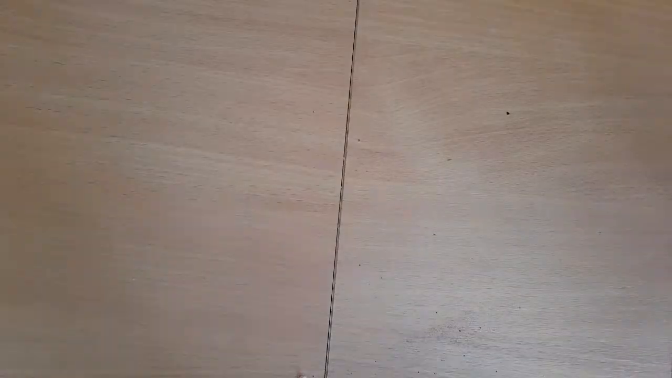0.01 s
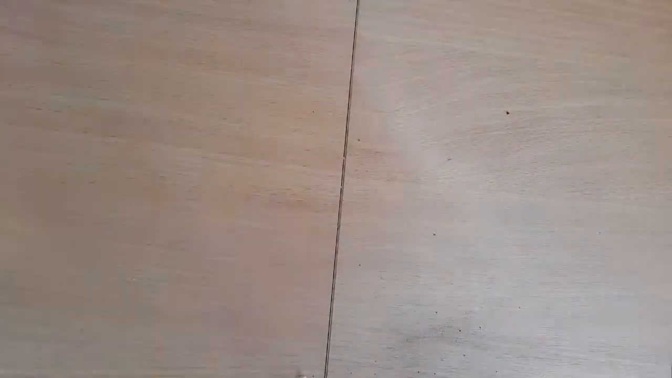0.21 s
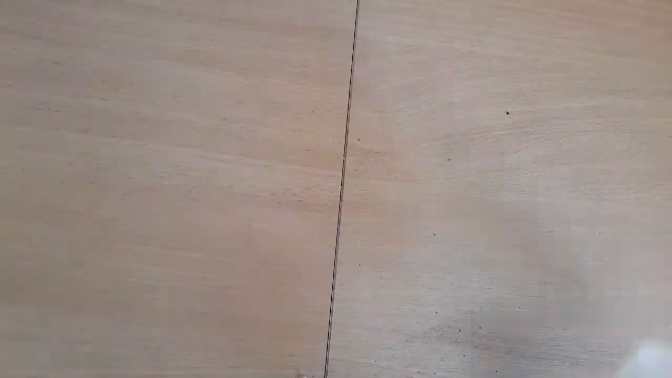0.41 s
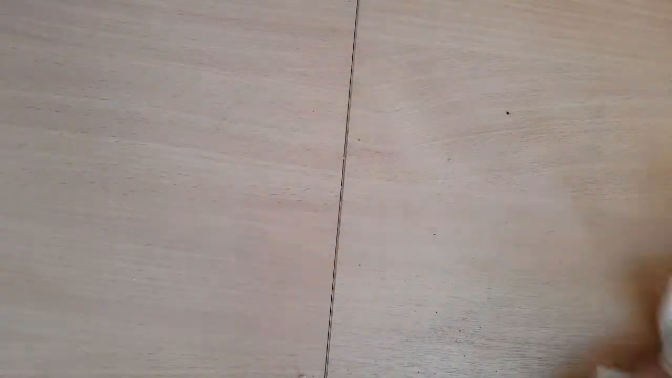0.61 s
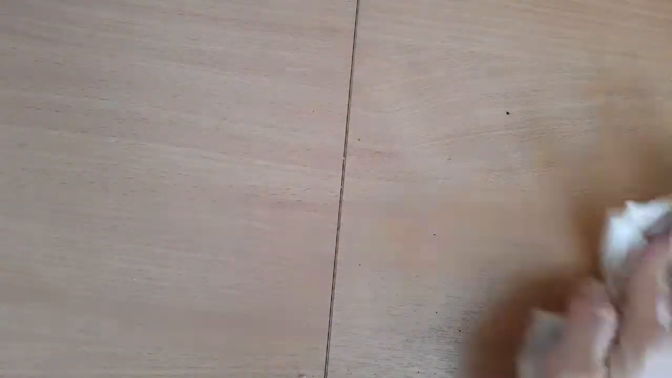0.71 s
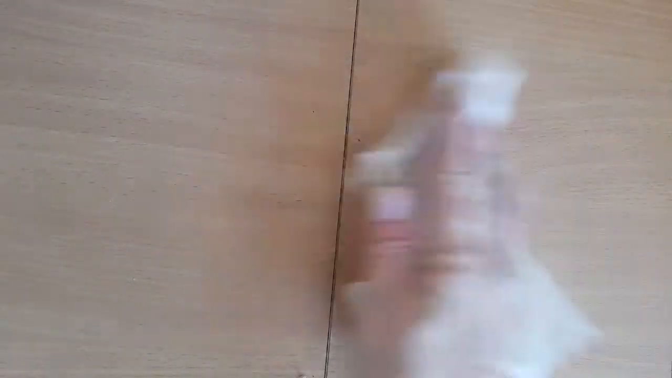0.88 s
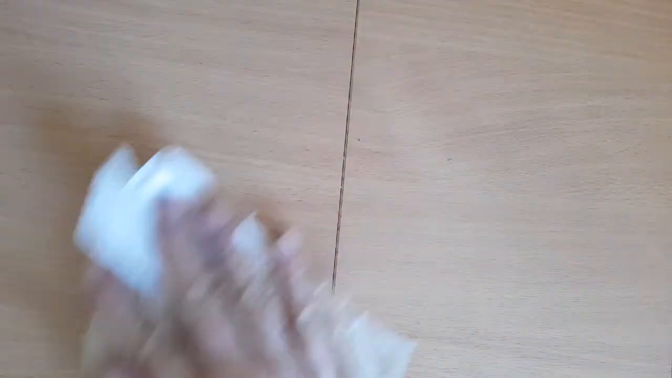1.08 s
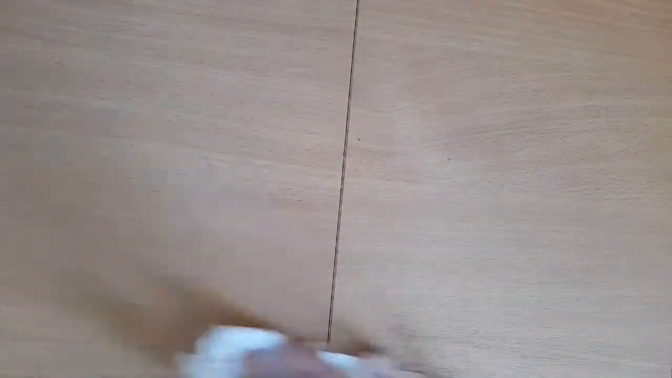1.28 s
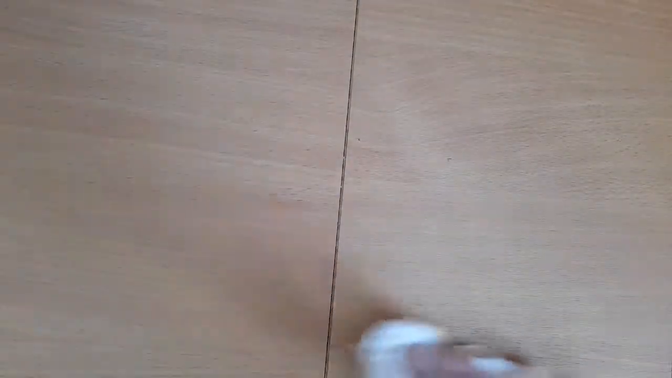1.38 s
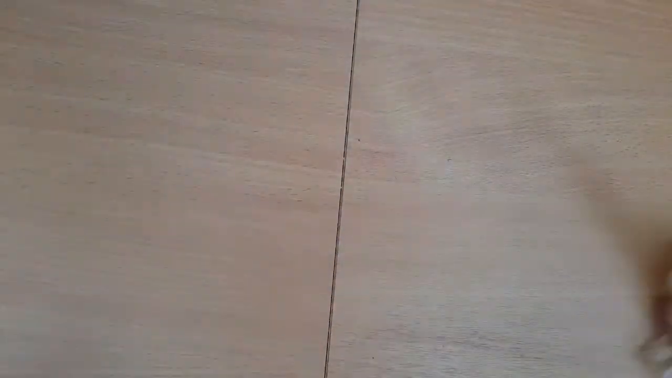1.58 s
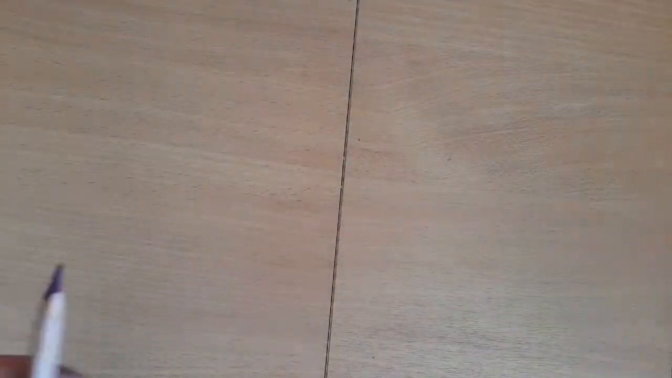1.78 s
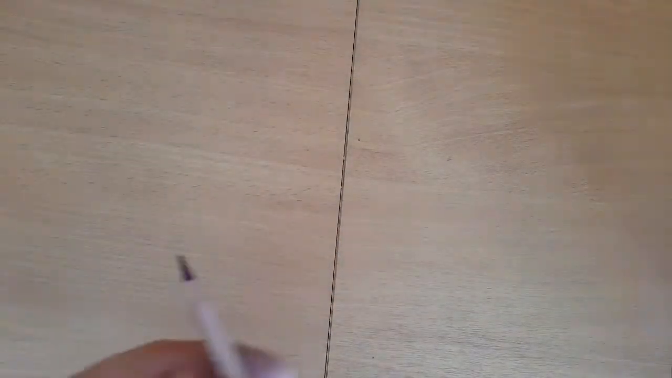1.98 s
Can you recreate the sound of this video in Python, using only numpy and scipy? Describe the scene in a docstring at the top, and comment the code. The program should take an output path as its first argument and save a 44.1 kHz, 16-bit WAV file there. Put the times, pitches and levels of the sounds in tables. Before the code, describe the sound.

Close stereo sound of a hand wiping a wooden desktop with tissue; hollow scrubbing and small thumps build to a crisp snap, followed by airy swishing, a few faint crackles and low room hum.

```python
"""Paper tissue wiping a wooden desk

A hand wipes a desk with a crumpled tissue, close to the microphone in a quiet, faintly humming room.
Friction is random slips with a juddering force; the board rumbles and rings through its resonances.
Catches, thumps and brief chattering tones punctuate the rub; the paper crackles and snaps once.
It sweeps with a bright hiss of shaped slip noise and lifts away."""
import sys
import numpy as np
from scipy import signal
from scipy.fft import rfft, irfft
from scipy.io import wavfile

SR = 44100
rng = np.random.default_rng(int(sys.argv[2]) if len(sys.argv) > 2 else 0)


def transcribe(u):
    """Save the signal u as a 16-bit wav file named by the first command-line argument.

    u: samples, shape (n,) or (channels, n), limited to [-1, 1]; the rate is SR.
    q: integer samples, one column per channel.
    """
    v = np.clip(np.atleast_2d(u).T, -1, 1)
    q = np.round(v * 32767).astype(np.int16)
    wavfile.write(sys.argv[1], SR, q)


N = 90405
T = np.arange(N) / SR  # time of every sample [s]

# path of the hand: (time [s], left ear lag [ms], left-right balance [dB])
HAND_PATH = [(0, -0.086, 3), (.26, 0.079, -0.5), (.4, 0.091, 0), (.62, 0.2, -0.4), (.76, 0.15, 1),
             (.92, 0.046, -0.3), (1.05, -0.14, 0.5), (1.22, -0.15, 2.7), (1.4, -0.026, 1.2),
             (1.62, 0.23, -1), (1.85, 0.27, -1.5)]
# spectrum of crackling creases: (frequency [Hz], relative density [dB per Hz])
CREASE_SPECTRUM = [(1500, -5), (3000, -7), (5500, 7), (8000, 6.5), (15000, -17)]


def from_db(db):
    """Logarithmic level: decibels to amplitude gain."""
    return 10 ** (np.asarray(db) / 20)


def rms_one(x):
    """Normalisation: scale to unit mean power."""
    return x / np.sqrt(np.mean(x ** 2) + 1e-20)


def in_time(rows):
    """Linear interpolation: each column of a curve at every sample."""
    times, *columns = np.transpose(rows)
    return [np.interp(T, times, column) for column in columns]


def low_noise(cutoff_hz):
    """Low-pass filtering of white noise leaves a slow random swing; rms 1."""
    sos = signal.butter(2, cutoff_hz, fs=SR, output="sos")
    return rms_one(signal.sosfilt(sos, rng.standard_normal(N)))


def colour(x, spectrum):
    """Linear filtering: give a signal a smooth spectrum; rms 1."""
    hz, db = np.transpose(spectrum)
    f = np.maximum(np.fft.rfftfreq(2 * N, 1 / SR), 1)
    # amplitude falls as the frequency squared outside the listed range
    skirt = np.minimum(f / hz[0], 1) ** 2 * np.minimum(hz[-1] / f, 1) ** 2
    gain = skirt * from_db(np.interp(np.log(f), np.log(hz), db))
    return rms_one(irfft(rfft(x, 2 * N) * gain)[..., :N])


def resonate(x, hz, width_hz):
    """Damped oscillator: a two-pole resonance with gain 1 on top."""
    r = np.exp(-np.pi * width_hz / SR)
    zeros = np.array([1, 0, -1]) * (1 - r * r) / 2
    poles = [1, -2 * r * np.cos(2 * np.pi * hz / SR), r * r]
    return signal.lfilter(zeros, poles, x + 1e-18)


def friction(per_s, spread_db, smooth_db):
    """Dry friction: uneven tiny slips at random moments, over smooth sliding noise."""
    sizes = from_db(spread_db * np.minimum(rng.exponential(1, N), 4)) * rng.choice([-1, 1], N)
    slips = rms_one(sizes * (rng.random(N) < per_s / SR))
    return rms_one(slips + from_db(smooth_db) * rng.standard_normal(N))


def judder(rate_hz, depth_db):
    """Amplitude modulation: random swings of contact force, their peaks limited by the soft hand."""
    limit = 1.5  # in standard deviations of the swing
    return rms_one(from_db(depth_db * np.minimum(low_noise(rate_hz), limit)))


def desk(x):
    """Modal resonance: the board adds its modes to whatever rubs on it."""
    # modes of the desk: (frequency [Hz], width [Hz], relative gain [dB])
    desk_modes = [(200, 100, -4), (360, 23, -12), (657, 8.9, 4.5), (715, 14, -3), (840, 23, -6.5),
                  (977, 15, -12), (1209, 22, 1), (1299, 11, 2.5), (1444, 15, -3), (1540, 14, -4.5),
                  (1860, 65, 1), (2710, 13, 5.5)]
    ring_db = -2.5  # added to every mode
    return x + sum(from_db(ring_db + db) * resonate(x, hz, width) for hz, width, db in desk_modes)


def place(x, scatter_db, room_db, scatter_s=0.0046):
    """Binaural lag and balance: direct sound, shifting near reflections and a room tail."""
    room_t60_s, shift_s, echo_low_hz = 0.064, 0.1238, 149
    lag_ms, pan_db = in_time(HAND_PATH)
    age = T[:N // 6]
    highpass = signal.butter(1, echo_low_hz, "high", fs=SR, output="sos")
    ears = []
    for side in (1, -1):  # left, right
        direct = np.interp(T - side * lag_ms / 2000, T, x)  # half the lag for each ear
        tail = rng.standard_normal(len(age)) * from_db(-60 * age / room_t60_s) * (age > .006)
        echo = from_db(room_db) * signal.fftconvolve(x, tail / np.linalg.norm(tail))[:N]
        # two reflection patterns trade places in quadrature
        for phase in (0, np.pi / 2):
            near = rng.standard_normal(len(age)) * np.exp(-age / scatter_s)
            share = np.cos(T / shift_s + phase)
            echo += from_db(scatter_db) * signal.fftconvolve(x * share, near / np.linalg.norm(near))[:N]
        echo = signal.sosfilt(highpass, echo)
        ears.append((direct + echo) * from_db(side * pan_db / 2))
    return rms_one(np.array(ears)) * x.std()


def stereo_balance():
    """Level difference between the ears: gains that follow the hand, left above right."""
    _, pan_db = in_time(HAND_PATH)
    return from_db(np.outer([1, -1], pan_db) / 2)


def room_tone(side_db=-10):
    """Stationary noise: a low rumble of the room with a sinusoidal mains hum."""
    # rumble spectrum: (frequency [Hz], relative density [dB per Hz])
    rumble_spectrum = [(20, -20), (45, -2), (75, -7), (100, 7), (135, -6), (200, -6.5), (330, -23.5),
                       (600, -23.5), (2000, -40), (15000, -42)]
    rumble_db, hum_db, hum_hz = -62.5, -68.5, 100
    mid, side = colour(rng.standard_normal((2, N)), rumble_spectrum)
    hum = from_db(hum_db) * np.sqrt(2) * np.sin(2 * np.pi * hum_hz * T)
    return from_db(rumble_db) * (mid + from_db(side_db) * side * [[1], [-1]]) + hum


def hollow(x):
    """Cavity resonance: the hollow between wad and desk glides as the hand presses."""
    # resonance: (time [s], centre frequency [Hz], height [dB])
    cavity_glide = [(.1, 1250, 0), (.24, 815, -5), (0.33, 1050, -3), (0.42, 1060, 7), (0.57, 900, 4),
                    (0.67, 1210, 7), (.755, 1500, 3), (0.85, 1370, 5.5), (0.94, 1450, 3.5), (.995, 980, 5),
                    (1.05, 1450, 10), (1.15, 1600, 9), (1.4, 1340, 11.5), (1.62, 1160, 8.5), (1.9, 980, -3)]
    width_octaves = 0.16  # standard deviation of the Gaussian peak
    hz, height_db = in_time(cavity_glide)
    f = np.log2(np.maximum(np.fft.rfftfreq(N, 1 / SR), 1))
    spectrum, out = rfft(x), 0
    # overlapping bands, each raised while the resonance passes over it
    centres = np.log2(np.geomspace(400, 4000, 12))
    for centre, weights in zip(centres, np.eye(len(centres))):
        band = irfft(spectrum * np.interp(f, centres, weights), N)
        distance = (centre - np.log2(hz)) / width_octaves
        out = out + band * from_db(height_db * np.exp(-distance ** 2 / 2))
    return rms_one(out)


def dragging_hand():
    """Stick-slip excitation: coarse slips shake the board; the wad under the palm adds a hollow rub."""
    # hand pressure, heard as board rumble: (time [s], level before trim [dB])
    drag_curve = [(0.0, -81), (0.08, -71.5), (0.17, -73), (0.2, -53.5), (0.275, -46.5), (0.335, -50.5),
                  (0.38, -47), (0.42, -56.5), (0.6, -54.5), (0.655, -45), (0.7, -54.5), (0.73, -49),
                  (0.89, -71.5), (0.99, -68.5), (1.03, -65), (1.1, -69), (1.17, -65.5), (1.3, -72),
                  (1.6, -72.5), (1.645, -60.5), (1.7, -71.5), (2.05, -79.5)]
    # rubbing of the wad, heard as hollow midrange: (time [s], level before trim [dB])
    rub_curve = [(0.0, -64.5), (0.05, -62), (0.16, -66.5), (0.26, -49.5), (0.39, -48), (0.53, -51),
                 (0.6, -43.5), (0.665, -39.5), (0.685, -47), (0.755, -39), (0.82, -47.5), (0.96, -57.5),
                 (0.995, -49), (1.025, -51.5), (1.12, -51.5), (1.19, -49.5), (1.225, -60), (1.5, -61.5),
                 (1.63, -51.5), (1.69, -65), (1.84, -53.5), (1.93, -73), (2.05, -90)]
    # spectra of board and wad: (frequency [Hz], relative density [dB per Hz])
    board_spectrum = [(55, 2), (110, 4.5), (200, 1), (310, 0.5), (450, -4.5), (660, 3), (880, 2.5),
                      (1200, -12.5), (2200, -7.5), (5000, -35)]
    wad_spectrum = [(480, -17), (680, -8), (1000, -2), (1500, -1.5), (2100, -3), (3000, -7), (6000, -17)]
    drag_trim_db, rub_trim_db = 3.5, 0.5
    (drag_db,), (rub_db,) = in_time(drag_curve), in_time(rub_curve)

    drag = colour(desk(friction(2200, 2.9, -7.5) * judder(104, 1.8)), board_spectrum)
    drag = drag * from_db(drag_db + drag_trim_db)
    rub = hollow(colour(desk(friction(800, 2.7, -8.5) * judder(220, 1.55)), wad_spectrum))
    rub = rub * from_db(rub_db + rub_trim_db)
    return place(drag, scatter_db=-4, room_db=-11.5) + place(rub, scatter_db=-3.5, room_db=-5)


def sliding_paper(spot_db=-5, spread_db=-2):
    """Friction noise of fibres on grain: rasp at and around the pressed spot, hiss of the whole sheet."""
    # sliding: (time [s], coarse rasp level before trims [dB], fine hiss level before trim [dB])
    slide_curve = [(0.0, -61, -69), (0.05, -59, -62.5), (0.1, -66.5, -70.5), (0.18, -60, -68),
                   (0.19, -50, -55.5), (0.22, -61, -64), (0.26, -52.5, -59.5), (0.37, -45.5, -47),
                   (0.45, -48, -54.5), (0.59, -50.5, -51.5), (0.66, -42.5, -47), (0.755, -42.5, -41),
                   (0.79, -45.5, -43), (0.94, -57.5, -45), (1.0, -43.5, -41.5), (1.03, -50.5, -43),
                   (1.21, -45, -41), (1.3, -57.5, -39), (1.52, -53.5, -41.5), (1.63, -49, -39),
                   (1.74, -51.5, -42.5), (1.77, -53, -49.5), (1.85, -57, -57.5), (1.865, -67, -62),
                   (1.92, -60.5, -64), (1.97, -65.5, -71), (2.0, -75, -72.5), (2.05, -75.5, -76)]
    # spectra of rasp and hiss: (frequency [Hz], relative density [dB per Hz])
    rasp_spectrum = [(900, -9.5), (1700, -4), (2300, 0), (3100, 2.5), (4500, 1.5), (6000, -4.5),
                     (8000, -6.5), (15000, -47)]
    hiss_spectrum = [(2500, -7.5), (5000, -2), (7000, -2), (9000, -1), (10800, 1), (13000, -.5),
                     (15000, -4.5), (16000, -12.5)]
    rasp_trim_db, hiss_trim_db = 0.5, 0.6
    rasp_db, hiss_db = in_time(slide_curve)
    rasp_db = rasp_db + rasp_trim_db

    spot = colour(friction(2000, 4.7, -6) * judder(140, 1.4), rasp_spectrum)
    spot = spot * from_db(rasp_db + spot_db)
    # independent slips in each channel make a wide sound
    around = np.array([friction(4000, 3.1, 0.67) for _ in "LR"]) * judder(63, 1.7)
    around = colour(around, rasp_spectrum) * from_db(rasp_db + spread_db)
    sheet = np.array([friction(9000, 3.7, 0.61) for _ in "LR"]) * judder(72, 0.59)
    sheet = colour(sheet, hiss_spectrum) * from_db(hiss_db + hiss_trim_db)
    wide = np.sqrt(2) * (around + sheet) * stereo_balance()
    return place(spot, scatter_db=2, room_db=-25.0) + wide


def creases():
    """Impulsive release: small folds crackle crisply, each with an exponential decay."""
    # crackles: (time [s], level before reflections [dB])
    crackle_events = [(0.048, -46), (0.186, -45), (.192, -52), (.197, -51), (0.239, -35.5), (0.307, -37),
                      (.399, -47), (0.985, -31), (0.997, -35), (1.789, -37), (1.849, -46), (1.885, -41),
                      (1.911, -42.5), (1.974, -53)]
    decay_s = 0.0068  # time constant
    bursts = sum(from_db(db) * (T >= s) * np.exp(-np.abs(T - s) / decay_s) for s, db in crackle_events)
    grain = colour(friction(3000, 1, 0), CREASE_SPECTRUM)
    grain = grain / np.percentile(np.abs(grain), 99)
    return place(bursts * grain, scatter_db=12, room_db=3)


def catches():
    """Stick-slip release: each catch knocks on the board, then a run of smaller slips dies away."""
    # catches: (time [s], peak level before the desk [dB], band centre [Hz], decay constant [s])
    catch_events = [(0.193, -41.5, 750, 0.0067), (0.265, -32, 1400, 0.0013), (0.268, -38, 315, 0.0022),
                    (0.278, -44, 360, 0.0042), (0.288, -51, 804, .002), (0.306, -29.5, 1720, 0.0027),
                    (0.312, -44, 1310, 0.0022), (0.32, -40, 1200, .002), (0.343, -36.5, 980, 0.003),
                    (.372, -31.5, 760, 0.006), (0.377, -37, 1180, 0.0028), (0.396, -43, 1100, 0.0038),
                    (0.418, -31, 980, 0.0031), (0.444, -35, 810, 0.0033), (0.48, -40.5, 700, .002),
                    (0.61, -45, 860, .0015), (0.631, -37, 1400, .002), (0.655, -30, 2000, .004),
                    (0.669, -31, 1100, 0.0012), (0.675, -31, 1090, 0.00069), (0.709, -31, 1300, 0.0023),
                    (0.725, -28, 1180, .006), (0.757, -26, 1410, 0.0043), (0.792, -31.5, 1140, 0.0032),
                    (0.993, -36, 1050, 0.0042), (1.117, -39, 1900, 0.0025), (1.172, -36, 1710, .005),
                    (1.202, -41, 1710, 0.0017), (1.877, -42.5, 1330, 0.0037), (1.912, -47, 890, 0.0015),
                    (1.955, -53, 850, 0.0033)]
    slips_db = -14
    band_ratio = 1.45  # band edges lie this factor below and above the centre
    out, age = np.zeros(N + SR), T[:N // 20]
    for s, db, hz, decay_s in catch_events:
        slips = from_db(slips_db) * rng.standard_normal(len(age)) * np.exp(-age / decay_s)
        force = (age == 0) + slips
        edges = hz * band_ratio ** np.array([-1, 1])
        burst = signal.sosfilt(signal.butter(2, edges, "band", fs=SR, output="sos"), force)
        start = int(s * SR)
        out[start:start + len(age)] += from_db(db) * burst / np.abs(burst).max()
    return place(desk(out[:N]), scatter_db=-46, room_db=-7.0)


def thumps():
    """Damped free vibration: soft bumps swing the whole desk top in its lowest mode."""
    # bumps: (time [s], level before attack and decay [dB], time to decay by 60 dB [s])
    bump_events = [(0.207, -41.5, .1), (0.276, -41.5, 0.14), (0.333, -45, 0.14), (.667, -34, 0.2),
                   (1.173, -36, 0.099), (1.54, -41.5, 0.11)]
    mode_hz, attack_s = 91.8, 0.0037
    swing = np.zeros(N)
    for s, db, t60_s in bump_events:
        age = np.maximum(T - s, 0)
        envelope = from_db(db - 60 * age / t60_s) * np.expm1(-age / attack_s)
        swing += envelope * np.sin(2 * np.pi * mode_hz * age)
    return place(swing, scatter_db=-13.0, room_db=-25)


def chatters():
    """Self-excited oscillation: stick-slip settles on one unsteady pitch, swells and lets go."""
    # tones: (start [s], length [s], level before the swell [dB], mean pitch [Hz])
    chatter_events = [(.229, 0.015, -41.5, 830), (0.252, 0.021, -47, 790), (0.695, 0.038, -43, 1380),
                      (0.727, 0.057, -38.5, 1450), (0.754, 0.0083, -32, 1514), (0.766, 0.021, -46, 1502),
                      (0.994, 0.02, -54, 830)]
    wander_depth, wander_hz = .085, 240.6  # rms share of the pitch; cutoff of its random motion
    out = np.zeros(N)
    for s, length_s, db, hz in chatter_events:
        pitch_hz = hz * (1 + wander_depth * low_noise(wander_hz))
        tone = np.sin(2 * np.pi * np.cumsum(pitch_hz) / SR) * judder(200, 1.6)
        swell = np.sin(np.pi * np.clip((T - s) / length_s, 0, 1))
        out += from_db(db) * rms_one(tone) * swell
    return place(out, scatter_db=-9, room_db=-11)


def skimming_paper():
    """Light-contact friction: loose edges of the sheet brush the wood with a very high sizzle."""
    # top treble of the skimming paper: (time [s], level [dB])
    skim_curve = [(.72, -72), (.84, -44), (.96, -44), (1.05, -43), (1.18, -56), (1.28, -46), (1.4, -46),
                  (1.5, -44), (1.6, -43), (1.74, -56), (1.85, -76)]
    # spectrum of the sizzle: (frequency [Hz], relative density [dB per Hz])
    sizzle_spectrum = [(7000, -29), (9500, -17), (11000, -8), (12500, -9), (15500, -3), (16000, -7)]
    (skim_db,) = in_time(skim_curve)
    sizzle = colour(np.array([friction(4400, 3.5, 2) for _ in "LR"]), sizzle_spectrum)
    return sizzle * from_db(skim_db) * stereo_balance()


def snap(crack_db=-15, flurry_db=-22, flurry_s=0.0076):
    """Buckling: a crease gives a sharp ringing tick with a broad crack, then a flurry of crackles."""
    time_s, level_db, pan_db = .7533, -13.8, -6  # negative pan: the right is louder
    ring_hz, ring_width_hz, crack_decay_s = 6800, 3900, .0005
    impulse = 1.0 * (np.arange(N) == int(time_s * SR))
    tick = resonate(resonate(impulse, ring_hz, ring_width_hz), ring_hz, ring_width_hz)
    tick = tick / np.abs(tick).max()

    age = np.where(T >= time_s, T - time_s, np.inf)  # infinite age: silent before the snap
    # differencing white noise brightens it
    crack = np.diff(rng.standard_normal(N + 1)) / 2 * np.exp(-age / crack_decay_s)
    flurry = colour(rng.standard_normal((2, N)), CREASE_SPECTRUM) * np.exp(-age / flurry_s)
    direct = place(tick + from_db(crack_db) * crack, scatter_db=-12, room_db=-12)
    direct = direct * from_db(np.array([[1], [-1]]) * pan_db / 2)
    return from_db(level_db) * (direct + from_db(flurry_db) * flurry)


def scene():
    """Superposition: hand, paper and desk add to the room tone."""
    wiping = dragging_hand() + sliding_paper() + skimming_paper()
    contacts = creases() + catches() + thumps() + chatters() + snap()
    return room_tone() + wiping + contacts


def record(dry):
    """Band limiting: a steep linear-phase low-pass cuts the top."""
    cutoff_hz = 15900
    lowpass = signal.firwin(401, cutoff_hz, fs=SR, window="blackman")
    return signal.fftconvolve(dry, lowpass[None], mode="same", axes=1)


dry = scene()
out = record(dry)
transcribe(out)
```